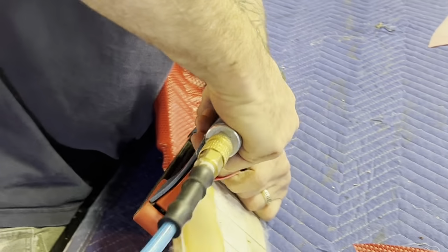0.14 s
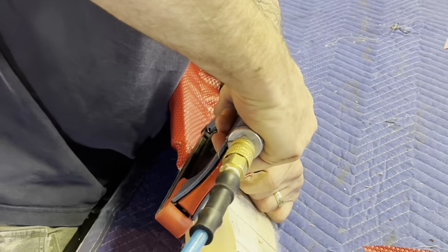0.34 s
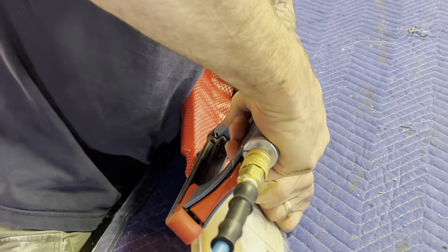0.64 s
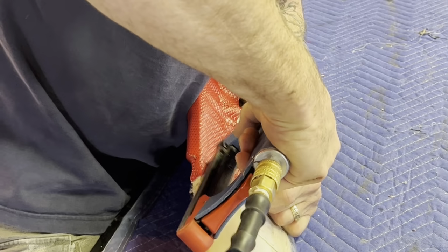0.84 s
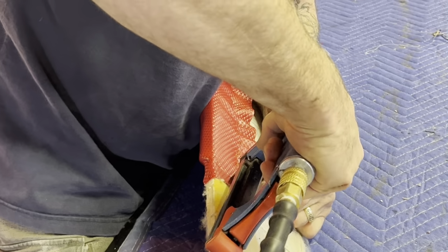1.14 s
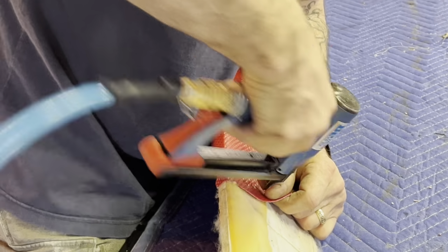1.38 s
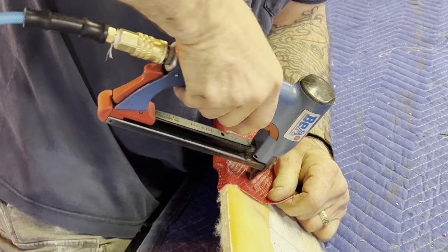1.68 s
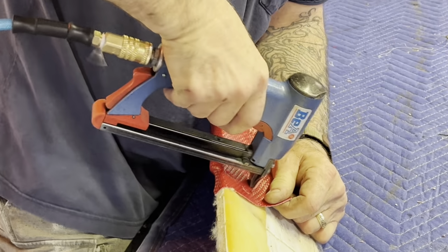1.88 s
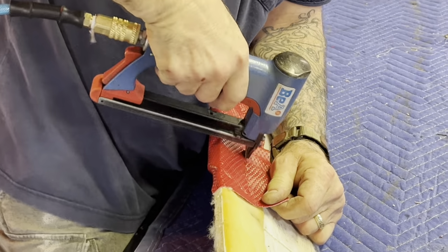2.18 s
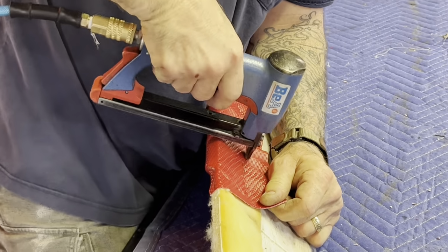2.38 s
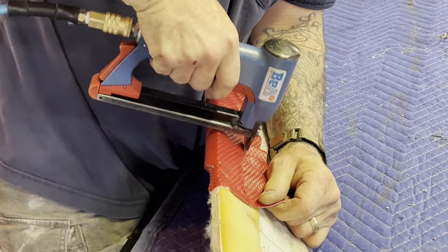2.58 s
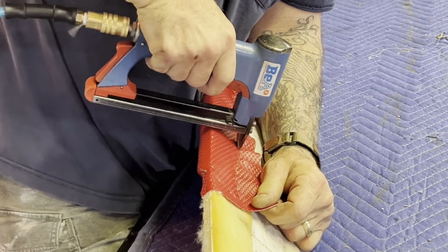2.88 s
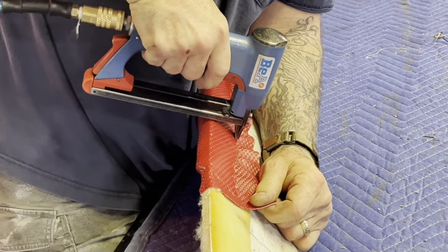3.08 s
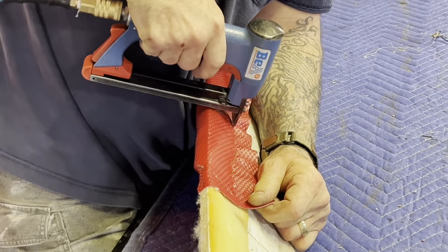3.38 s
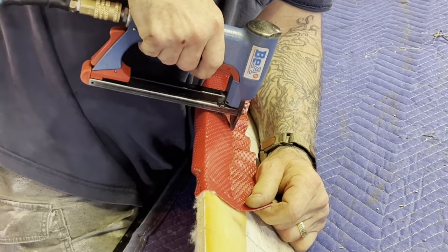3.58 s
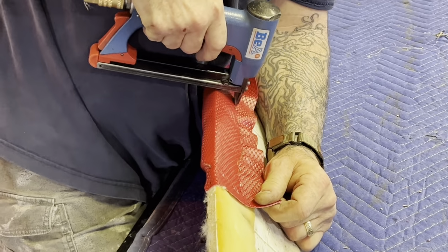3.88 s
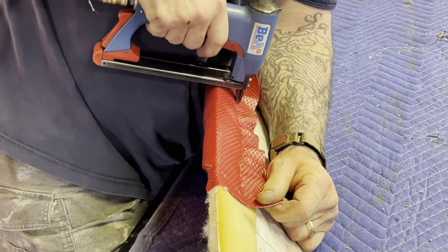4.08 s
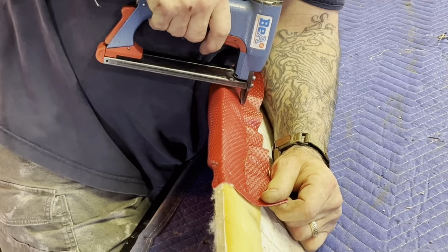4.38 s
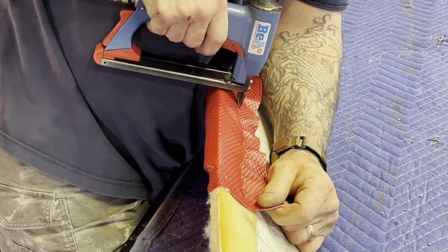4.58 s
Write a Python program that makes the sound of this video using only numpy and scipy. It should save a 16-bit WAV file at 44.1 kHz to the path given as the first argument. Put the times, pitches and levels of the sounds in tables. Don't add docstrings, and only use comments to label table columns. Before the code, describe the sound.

An air-powered stapler fires eight sharp, cracking shots at uneven intervals, each followed by a short puff of exhaust, in a humming hard-walled workshop.

```python
import sys
import numpy as np
from scipy import signal
from scipy.fft import rfft, irfft, next_fast_len
from scipy.io import wavfile
from scipy.ndimage import uniform_filter1d, map_coordinates

SR = 44100
rng = np.random.default_rng(int(sys.argv[2]) if len(sys.argv) > 2 else 0)


def wav_record(signal):
    frames = np.transpose(np.atleast_2d(signal))
    bounded = np.clip(frames, -1, 1)
    quanta = np.round(bounded * 32767).astype(np.int16)
    wavfile.write(sys.argv[1], SR, quanta)


def invert_db(level):
    return 10 ** (np.asarray(level, dtype=float) / 20)


N = 209014
SPAN = SR * 3 // 5


def unit(x):
    return x / np.sqrt(np.mean(x ** 2) + 1e-20)


def along(points, hz):
    f, v = np.transpose(points)
    return np.interp(np.log(hz + 1), np.log(f + 1), v)


def filtered(x, response):
    n = x.shape[-1]
    m = next_fast_len(n + 8192)
    return irfft(rfft(x, m) * response(np.fft.rfftfreq(m, 1 / SR)), m)[..., :n]


def hiss(spectrum, size):
    return unit(filtered(rng.standard_normal(size), lambda hz: invert_db(along(spectrum, hz))))


def modes(table):
    def response(f):
        total = 0
        for k, (centre, width, db) in enumerate(table):
            damping = 1j * f * width
            total = total + (-1) ** k * invert_db(db) * damping / (centre ** 2 - f ** 2 + damping)
        return total
    return response


def fade(t, attack, t60):
    u = np.maximum(t, 0)
    return (1 - np.exp(-u / attack)) * invert_db(-60 * u / t60)


def wobble(rate):
    knots = rng.standard_normal(int(N * rate / SR) + 4)
    return map_coordinates(knots, [np.arange(N) * rate / SR])


def sag(t, db):
    return invert_db(db) * fade(t, 0.0062, 0.19) * np.sin(2 * np.pi * 62 * t)


# band_hz, t60_s, level_db
WALL_DECAY = [(60, 0.3, -7.5), (200, 0.38, -5), (594, 0.23, -2), (2000, 0.28, -3.5), (5270, 0.32, -3.5),
              (13600, 0.23, -11.5)]
# delay_s, mirrored_bass_db, scattered_treble_db
NEAR_WALLS = [
    (0.0196, -11, -10.5),
    (0.039, -28, -29),
]


def add(track, start, sound, wet_db):
    hz, t, z = signal.stft(rng.standard_normal((2, SPAN)), SR, nperseg=256)
    t60, db = (along([(row[0], row[k]) for row in WALL_DECAY], hz)[:, None] for k in (1, 2))
    tail = signal.istft(z * invert_db(db) * fade(t - .006, 0.0009, t60), SR, nperseg=256)[1][:, :SPAN]
    room = invert_db(wet_db) * tail / np.linalg.norm(tail[0])
    t = np.arange(SPAN) / SR
    for lag, bass_db, treble_db in NEAR_WALLS:
        mirror = fade(t - lag, .0001, .002)
        scatter = fade(t - lag + .006, 0.0047, 0.013) * rng.standard_normal((2, SPAN))
        room += invert_db(bass_db) * mirror / mirror.sum()
        room += invert_db(treble_db) * scatter / np.linalg.norm(scatter[0])
    room[:, 0] = 1
    wet = signal.fftconvolve(sound[None], room, axes=1)[:, :SPAN]
    track[:, round(start * SR):][:, :SPAN] += wet


# bottoming_out_s, shear_earlier_by_s, rebound_later_by_s
STROKES = [
    (.7108, .004, .005),
    (1.1273, .0027, .0024),
    (1.8805, .0049, .0034),
    (2.439, .0048, .0035),
    (2.8378, .0043, .0043),
    (3.1897, .0035, .0041),
    (3.5542, .0044, .0043),
    (4.5515, .0041, .0033),
]
# peak_db, panel_response_db, tool_ring_db, stiffness_pitch_ratio
SPOTS = [
    (-4.5, -1.4, -5.7, 1.2),
    (-2.5, 5, 0, 1.9),
    (-1, -2.5, -6, 1.3),
    (-2, -2.5, -1.5, 1.54),
    (-2, 1.5, 1.1, 0.929),
    (-5.5, 4, 7.5, 0.96),
    (-3.5, -0.1, 3.3, 1.01),
    (-0.5, 0.66, -2.5, 0.92),
]
# level_db, brightness_db, wood_db, tool_ring_db, pitch_ratio
ON_EDGE = [
    (-7.5, -1, -12, -17, 0.71),
    (3.5, -7, -9.5, -17.5, 0.83),
    (-1, 1, -14, -10.5, 1.7),
]
# level_db, brightness_db, wood_db, tool_ring_db, pitch_ratio
ON_FACE = [
    (-8.5, -11, -3.5, -7, .9),
    (1.2, 1.5, -5, -13, 1.1),
    (-6.5, -8.5, -5.5, 0.5, .95),
]
# centre_hz, width_hz, level_db
SNAP = [(1100, 1200, 8), (2050, 1300, 11), (3000, 1900, 1.5)]
# centre_hz, width_hz, level_db
GLINT = [(4860, 1800, -5.5), (7000, 1500, -9.5), (13000, 12000, -25)]
# centre_hz, width_hz, level_db
WOOD = [(235, 600, 5), (394, 260, 11), (605, 230, -2.5), (900, 260, 9)]
# centre_hz, width_hz, level_db
HOUSING = [(1867, 99, 5), (1699, 30, -11), (1915, 17, -2.5), (1430, 29, -7.5), (2480, 75, -13),
           (3550, 480, -9)]


def driver(track):
    t = np.arange(SPAN // 6) / SR
    turn_s = 1.5
    for (bottom, lead, lag), (peak_db, panel_db, tool_db, stiff) in zip(STROKES, SPOTS):
        stages = ON_EDGE if bottom < turn_s else ON_FACE
        times = (bottom - lead, bottom, bottom + lag)
        for s, (db, bright_db, wood_db, ring_db, pitch) in zip(times, stages):
            push = invert_db(-60 * t / .006) * rng.standard_normal(len(t)) * .25 - (t == 0)
            steel = filtered(push, lambda f: modes(SNAP)(f / (stiff * pitch)))
            steel = steel + invert_db(bright_db) * filtered(push, modes(GLINT))
            body = invert_db(wood_db + panel_db + 8.0) * filtered(push, modes(WOOD))
            body = body + invert_db(ring_db + tool_db + 13.0) * filtered(push, modes(HOUSING))
            add(track, s, invert_db(peak_db + db) * (steel + body) / np.abs(steel).max(), wet_db=-8.0)


# full_flow_s, hiss_db, opening_s, held_leak_db, board_db
PULLS = [
    (0.7074, -13, 0.011, -40, -17.5),
    (1.120, -10.5, 0.0063, -50, -20),
    (1.874, -15.5, 0.0099, -45.5, -18),
    (2.432, -19.5, 0.011, -47.5, -23),
    (2.833, -19.5, 0.022, -43.5, -23),
    (3.184, -16.5, 0.013, -43.5, -23),
    (3.546, -19.5, .011, -44, -20.5),
    (4.545, -19.5, 0.04, -48, -24.5),
]
# freq_hz, level_db_per_hz
VALVE = [(300, -40.5), (1000, -4), (2500, 1), (4500, -2.5), (6800, 1), (9000, -4.5), (13000, -5.5),
         (16000, -16.5)]


def pulls(track):
    t = np.arange(SPAN // 2) / SR - .04
    for (s, db, opening, leak_db, board_db), release in zip(PULLS, RELEASES):
        swell_db = np.where(t < 0, 45 * t / min(opening, .018), -60 * t / .05)
        rush = invert_db(db + swell_db) * (1 - fade(t - .009, .0015, 99))
        held = t < release[0] - s
        leak = invert_db(leak_db - 4.5 + 25.5 * t) * fade(t, .015, 99) * held
        boom = invert_db(board_db) * fade(t - .006, .012, .16) * np.sin(2 * np.pi * 125 * (t - .006))
        recoil = sag(t - 0.021, board_db - 11.5)
        add(track, s - .04, (rush + leak) * hiss(VALVE, len(t)) + boom + recoil, wet_db=-35.5)


# start_s, puff_db, housing_ring_db, thump_hz, table_sag_db
RELEASES = [
    (0.8746, -16, -27.5, 195, -17.5),
    (1.246, -18, -34, 202.2, -22.5),
    (2.006, -17.5, -22.5, 229.6, -29.5),
    (2.562, -18.5, -24.5, 246.4, -28),
    (2.959, -17, -24.5, 236, -28),
    (3.288, -18, -24, 224, -26.5),
    (3.661, -18, -25.5, 233, -28.5),
    (4.7109, -18, -19, 237, -31),
]
# freq_hz, level_db_per_hz
EXHAUST = [(150, 0.5), (500, -4), (1200, -7), (2500, -1.5), (4000, -3.5), (7000, -4), (9500, -8),
           (13500, -5), (16000, -21.5)]


def releases(track):
    t = np.arange(SPAN // 2) / SR
    for s, db, ring_db, thump_hz, sag_db in RELEASES:
        creep = invert_db(db - 15.0 - 60 * t[:600][::-1] / 0.02) * hiss(EXHAUST, 600)
        track[:, round(s * SR) - 600:][:, :600] += creep
        tick = filtered(invert_db(-60 * t / .006) * rng.standard_normal(len(t)), modes(SNAP))
        puff = invert_db(db + 7.0) * fade(t - .0008, 0.0012, 0.091) * hiss(EXHAUST, len(t))
        puff = puff + invert_db(db + 5.5) * tick
        turns = thump_hz * (t - 13 * t ** 2) - .44
        thump = invert_db(db + 2.5) * np.exp(-((t - .0095) / 0.0052) ** 2) * np.cos(2 * np.pi * turns)
        rattle = fade(t - .022, 0.0028, 0.061) * rng.standard_normal(len(t))
        ring = filtered(rattle, modes(HOUSING))
        ring = invert_db(ring_db + 10.0) * ring / np.abs(ring).max()
        add(track, s, puff + thump + sag(t - .008, sag_db) + ring, wet_db=-14)


# start_s, level_db, pitch_hz, length_s
FAINT_TONES = [(.693, -51, 7200, 0.009), (1.098, -45, 4970, .02), (1.102, -48.5, 5700, 0.02),
               (1.1, -55, 1750, .018), (1.85, -56.5, 4395, .018), (1.848, -55.5, 5000, 0.03),
               (1.848, -52, 1657, 0.025), (2.408, -62, 4674, .02), (2.407, -54, 1700, .02),
               (3.528, -52, 5500, 0.022)]


def faint_tones(track):
    t = np.arange(SPAN // 2) / SR
    for s, db, hz, length in FAINT_TONES:
        tone = fade(t, .003, 99) * (t < length) * np.sin(2 * np.pi * hz * t)
        track[:, round(s * SR):][:, :len(t)] += invert_db(db) * tone


# start_s, peak_db, centre_hz, width_hz, t60_s
TICKS = [(.027, -36.5, 4080, 1470, 0.017), (0.029, -31.5, 7250, 5300, 0.0086),
         (0.026, -42.5, 2100, 1180, 0.028), (.025, -51.5, 1430, 50, .012), (.556, -51.5, 5560, 2540, 0.044),
         (.572, -44.5, 5160, 3000, 0.023), (.603, -46.5, 5300, 3000, 0.018), (1.645, -52.5, 900, 900, 0.25),
         (2.131, -33.5, 1070, 1100, 0.014), (2.137, -37, 330, 200, 0.016), (2.27, -60.5, 3000, 2000, .02),
         (4.288, -51.5, 2580, 4000, 0.012), (4.421, -60.5, 1140, 509, 0.015)]


def ticks(track):
    t = np.arange(SPAN // 2) / SR
    for s, db, hz, width, t60 in TICKS:
        knock = fade(t, 0.0003, t60) * rng.standard_normal(len(t))
        tick = filtered(knock, lambda f: modes([(hz, width, 0)])(f) ** 2)
        add(track, s, invert_db(db) * tick / np.abs(tick).max(), wet_db=-14.5)


# centre_s, level_db, pitch_hz, half_length_s
BUMPS = [
    (0.0303, -27.5, 104, 0.0068),
    (0.082, -36.5, 69, 0.018),
    (1.462, -43, 69.3, 0.032),
    (2.148, -39, 122.6, 0.0097),
]


def bumps():
    t = np.arange(N) / SR
    total = np.zeros(N)
    for s, db, hz, half in BUMPS:
        total -= invert_db(db) * np.exp(-((t - s) / half) ** 2) * np.cos(2 * np.pi * hz * (t - s))
    return total


# start_s, level_db, pitch_hz, t60_s
PINGS = [
    (.595, -60, 2686, 1.2),
    (1.467, -58, 1717, .9),
    (1.49, -68, 3235, .4),
    (2.17, -69, 2686, .5),
    (3.42, -73, 2686, .6),
    (4.03, -77, 2686, .5),
    (4.385, -68, 3235, .45),
    (4.385, -69, 1717, .7),
]


def pings(track):
    t = np.arange(SPAN // 2) / SR
    for s, db, hz, t60 in PINGS:
        envelope = fade(t, 0.0056, t60) * fade(t[::-1], .04, 99)
        add(track, s, invert_db(db) * envelope * np.sin(2 * np.pi * hz * t), wet_db=-12.5)


# pitch_hz, level_db
MOTOR_LINES = [(61, 5), (118.4, 3.5), (1023, -13.5)]
# freq_hz, level_db_per_hz
RUMBLE = [(15, -33.5), (25, -10.5), (65, 0.5), (91, -7), (123, -2), (151, -23), (200, -36), (260, -54),
          (440, -120)]
# freq_hz, level_db_per_hz
AIR = [(88, -39), (150, -4), (759, -10), (905, -11.5), (1040, -8), (1240, -17), (1720, -10), (2450, -20),
       (7470, -30), (13000, -38), (16000, -46)]
# time_s, level_db
COMPRESSOR = [(0, -67), (3.3, -66), (4.2, -61.5), (4.74, -57.5)]
# time_s, gain_db
GAIN = [(0, -1), (.57, -1.5), (1.49, -1), (1.75, -3), (2.2, -11.5), (2.63, -7), (3.31, -10), (3.91, -10),
        (4.74, -11.5)]


def shop():
    t = np.arange(N) / SR
    gain_db = np.interp(t, *np.transpose(GAIN))
    air = invert_db(-56.5 + gain_db + 1.2 * wobble(2.7)) * hiss(AIR, (2, N))
    rumble_db = -52.5 + 1.4 * gain_db + 12.5 * np.exp(-t / .1)
    rumble = invert_db(rumble_db + 2.3 * wobble(9)) * hiss(RUMBLE, (2, N))
    motors = np.zeros(N)
    for hz, db in MOTOR_LINES:
        motors += invert_db(db + 3.2 * wobble(16)) * np.sin(2 * np.pi * hz * t + .6 * wobble(9))
    motors *= invert_db(-57.5 + 1.2 * gain_db)
    compressor_db = np.interp(t, *np.transpose(COMPRESSOR)) + 3 + 2.5 * wobble(5)
    compressor = invert_db(compressor_db) * np.sin(2 * np.pi * 92 * t + .6 * wobble(4))
    return air + rumble + motors + compressor


def scene():
    track = np.zeros((2, N + SPAN))
    for source in (driver, pulls, releases, faint_tones, ticks, pings):
        source(track)
    return track[:, :N] + bumps() + shop()


def without(x, bands, attack):
    hz, t, z = signal.stft(x, SR, nperseg=512)
    at = np.minimum(t * SR, N - 1).astype(int)

    def edge():
        return 260 * np.round(wobble(9)[at // 1024 * 1024])

    weak = np.zeros(z.shape, bool)
    for low, high in bands:
        weak |= (hz[:, None] > low + edge()) & (hz[:, None] < high + edge())
    return signal.istft(z * (1 - weak * ~attack[at]), SR, nperseg=512)[1][:N]


def top_cut(x):
    return signal.sosfilt(signal.butter(12, 16800, fs=SR, output="sos"), x)


# freq_hz, side_db
PORT_LAG = [(100, -32.5), (400, -32), (1300, -7.5), (2400, -15.5), (3500, -14), (4500, -31.5), (5600, -6),
            (6800, -24.5), (7700, -5.5), (11000, 3), (12900, -20), (14000, 1), (16000, 10.5)]
# freq_hz, side_db
PORT_SPREAD = [(100, -23), (400, -9), (1400, 0), (3000, -22), (4500, -36.5), (15000, -18.5)]
# from_hz, to_hz
WEAK_MID = [(9150, 10850), (15000, 22050)]
# from_hz, to_hz
WEAK_SIDE = [(3700, 5200), (6500, 7500), (12000, 13600)]


def record(dry):
    both, apart = dry.mean(0), (dry[0] - dry[1]) / 2
    mid = filtered(both, lambda hz: 1 - 0.78 * np.exp(-np.abs((hz - 9950) / 1400) ** 3))
    side = filtered(both, lambda hz: 1j * invert_db(along(PORT_LAG, hz)))
    side = side + filtered(apart, lambda hz: invert_db(along(PORT_SPREAD, hz)))
    attack = uniform_filter1d(np.diff(both, prepend=0) ** 2, size=600) > invert_db(-41)
    mid = without(mid, WEAK_MID, attack)
    side = without(side, WEAK_SIDE, attack)
    pair = np.array([mid + side, mid - side])
    pair = filtered(pair, lambda hz: hz ** 2 / (hz ** 2 + 24 ** 2) / (1 + (hz / 15500) ** 70))
    ceiling, knee = .97, 8
    pair = pair / (1 + np.abs(pair / ceiling) ** knee) ** (1 / knee)
    return top_cut(pair)


dry = scene()
out = record(dry)
wav_record(out)
```